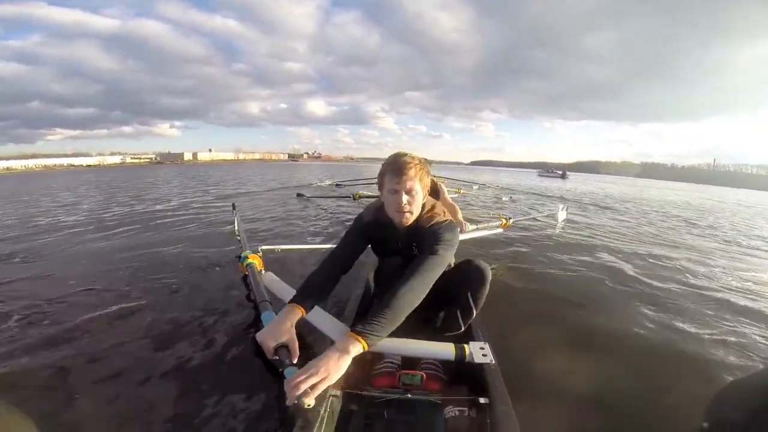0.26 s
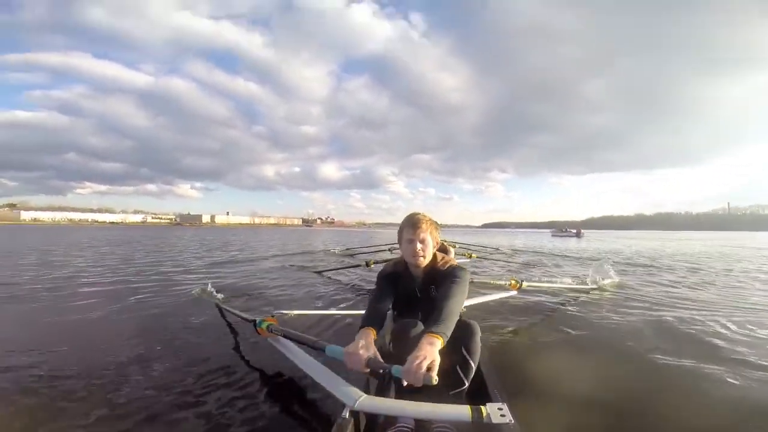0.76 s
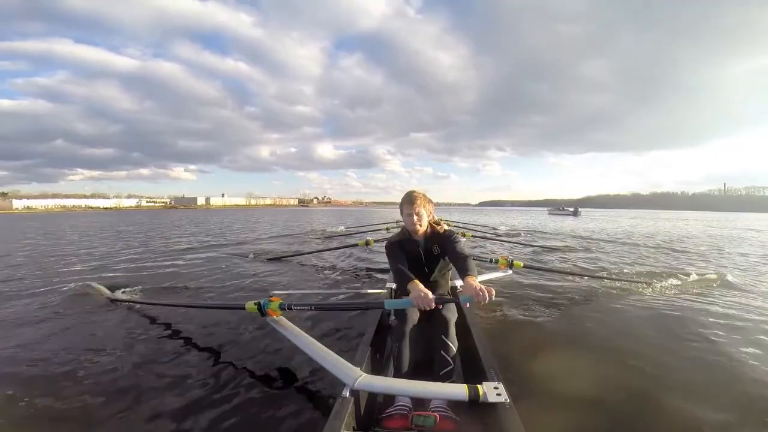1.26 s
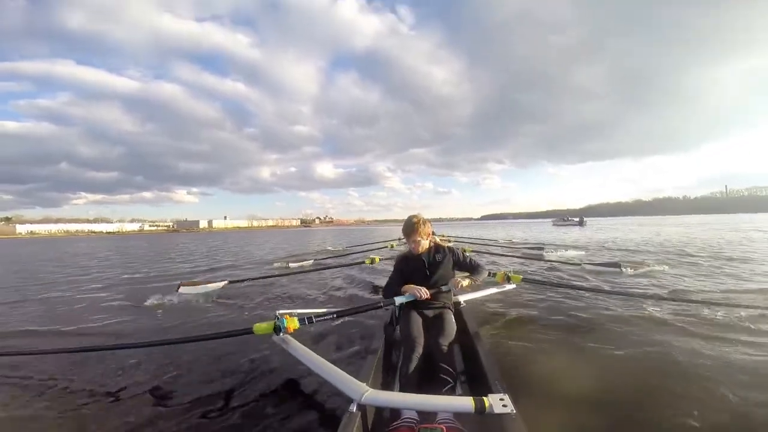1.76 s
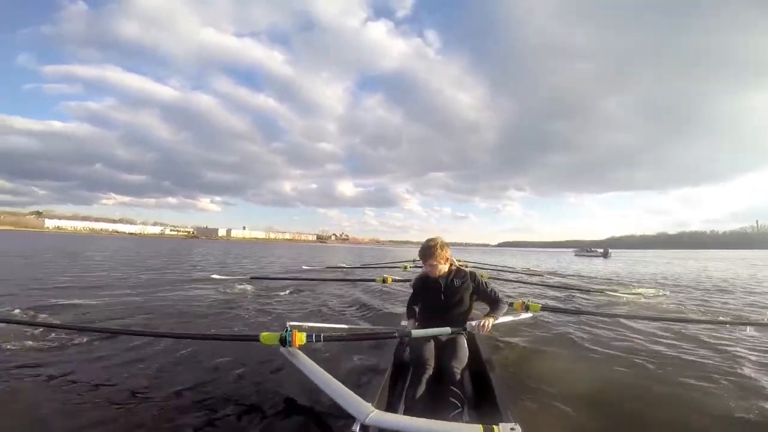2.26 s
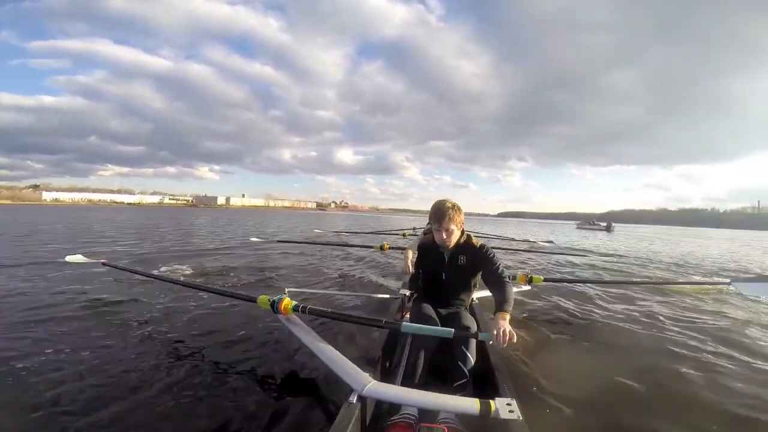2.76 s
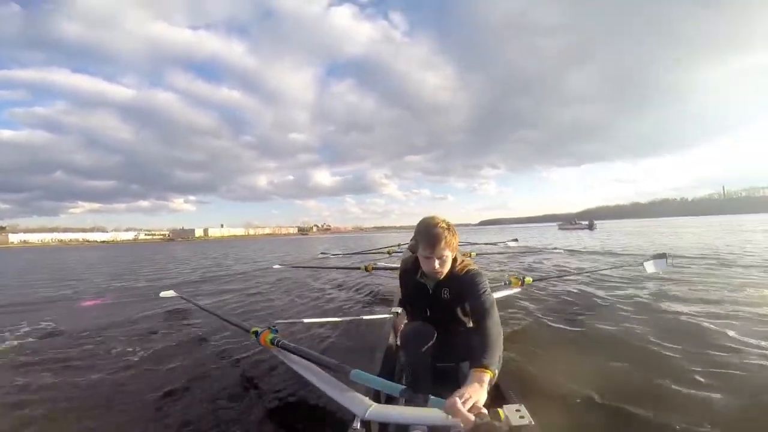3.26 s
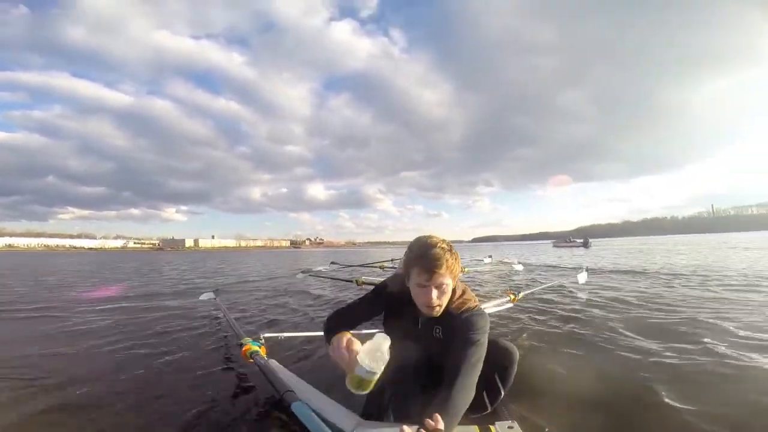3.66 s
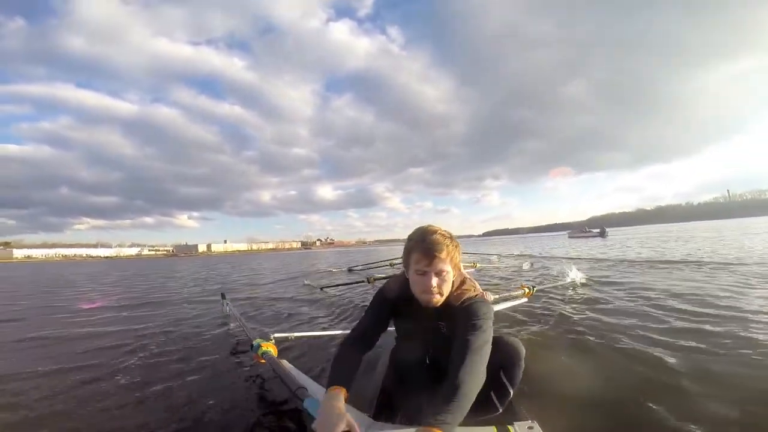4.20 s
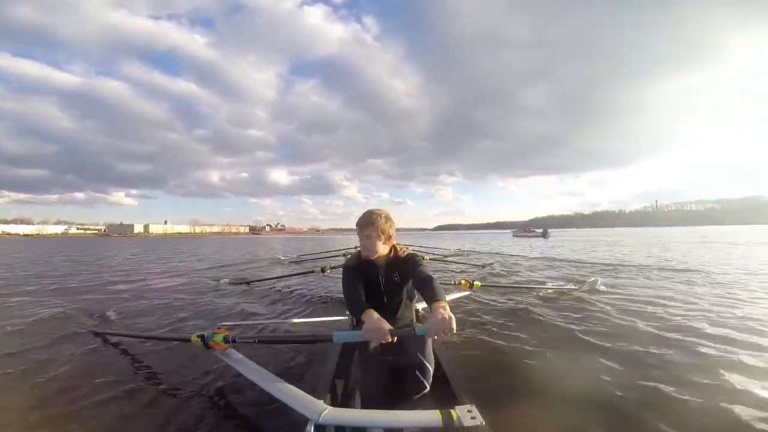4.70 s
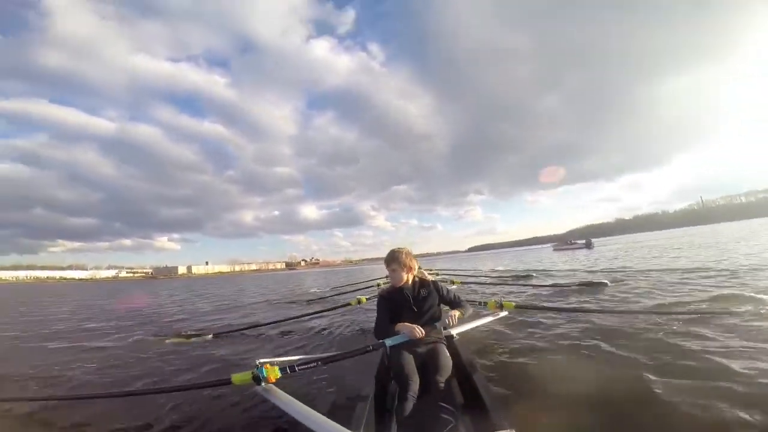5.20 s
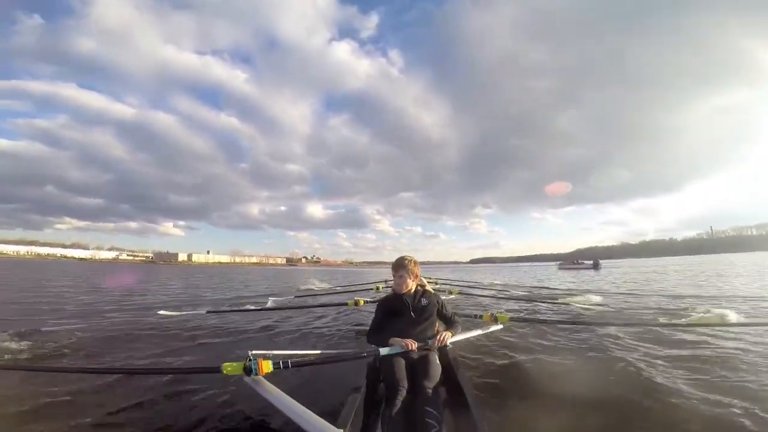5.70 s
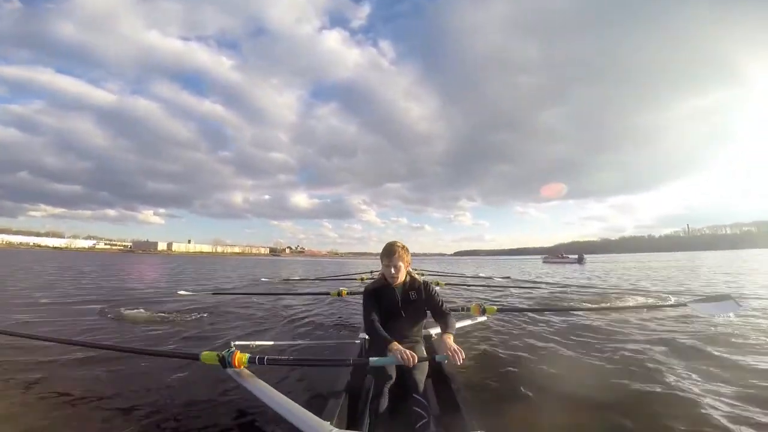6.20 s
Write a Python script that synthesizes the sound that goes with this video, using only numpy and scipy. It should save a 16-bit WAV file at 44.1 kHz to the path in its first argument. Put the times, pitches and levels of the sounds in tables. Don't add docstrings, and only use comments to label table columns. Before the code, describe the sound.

A camera in a sealed plastic housing rides a rowing shell on open water, so everything is close, boxy and muffled. From 0 to 0.7 seconds fingers scrape, squeak and tap the case, its walls bulging and popping with low pressure bumps; the scrape near 0.42 is sharpest. Very hard low blows hit at 0.98 and around 1.15, among more rubbing, with smaller thuds and a sharp tug from 1.48 to 1.55. Handling then ends. Water rumbles and gurgles while wet spray rustles on the case; small clicks fall near 1.8-2.1, and soft hull thumps at 1.97, 2.33-2.63. After 2.7 it is much quieter: light oarlock knocks at 3.46, clusters around 3.9 and 4.4, tiny plops, a dull thump at 5.2, more clicks and a plop at 5.45. Faint hiss, thin high whine and barely audible chirps about every 1.1 seconds persist to 6.4.

```python
import sys
import numpy as np
from scipy import signal
from scipy.fft import rfft, irfft, next_fast_len
from scipy.io import wavfile
from scipy.ndimage import map_coordinates

SR = 44100
rng = np.random.default_rng(int(sys.argv[2]) if len(sys.argv) > 2 else 0)


def waveform_to_disk(signal):
    frames = np.transpose(np.atleast_2d(signal))
    scaled = np.clip(frames, -1, 1) * 32767
    samples = np.round(scaled).astype(np.int16)
    wavfile.write(sys.argv[1], SR, samples)


def volts_from_decibels(level):
    exponent = np.asarray(level, float) / 20
    return 10 ** exponent


N = 284445

# (centre [Hz], width [Hz], level [dB])
LOW_BODY_MODES = [(1248, 470, -8), (1549, 252, 1.5), (1812, 293, -1)]
HIGH_BODY_MODES = [(2008, 120, 1.5), (2170, 134, -0.5), (2340, 130, 2), (2700, 192, 2.5), (2920, 256, 2.5),
                   (3277, 450, -7), (3560, 210, -6.5)]
EDGE_MODES = [(3745, 1650, -1), (4420, 1380, 6.5)]
RIM_MODES = [(5607, 440, -2.5), (6010, 280, 1), (6300, 470, -9)]
AIR_MODES = [(6970, 1300, 1), (9130, 820, 2), (9430, 490, 7.5), (12400, 4700, -16)]
DRY_SKIN_MODES = [(8850, 800, 2.5), (10400, 1500, -4.5), (12800, 3000, -7)]
DULL_MODES = [(289.5, 147, 1), (600, 570, -1.4), (922, 630, -1.2)]
KNOCK_MODES = [(1630, 670, -6.5), (2275, 775, -1.5), (2720, 750, -3)]
CLINK_MODES = [(4300, 1300, -3.5), (5590, 880, -2), (6300, 660, -4.5)]
PIN_MODES = [(4220, 900, -1.5), (6170, 490, -10)]
# (centre [Hz], width [Hz], level [dB])
WET_HIGH_MODES = [(2140, 390, 0.5), (2500, 300, 2.5), (2873, 330, -2)]
DRAINED_LOW_MODES = [(1070, 200, -3.5), (1650, 310, 10.5)]
DRAINED_HIGH_MODES = [(2060, 620, -4.5), (2700, 660, -0.5), (3250, 1180, -11.5)]

# (start [s], length [s], level [dB], high over low body [dB], hardness [dB])
SCRAPES = [(0, 0.023, -32.5, 6, -2), (0.018, 0.043, -34.5, 7, -6.5), (0.041, 0.079, -44.5, 2, -10.5),
           (0.114, 0.19, -52.5, 1, -8), (0.281, 0.16, -52.5, 2, -9.5), (0.4122, 0.011, -22.5, 10.5, -11),
           (0.421, 0.037, -27, 7.5, -16), (0.454, .062, -48, -2, -14), (0.513, 0.45, -45.5, -2.5, -11),
           (0.653, 0.038, -31, 2, -3), (0.684, 0.035, -35.5, -8, -4), (0.723, 0.049, -54, -3, -9),
           (0.816, 0.19, -43.5, -2.5, -14), (0.99, 0.39, -48.5, 2, -12.5), (1.291, 0.11, -44, 1.5, -11.5),
           (1.143, 0.057, -36.5, -1.5, -9), (1.179, 0.12, -40.5, 4.5, -10), (1.32, 0.22, -43.5, 0, -16.5)]
# (peak [s], length [s], level [dB], high over low body [dB], hardness [dB])
SWELLS = [(0.4307, 0.047, -21.5, 8, -2.5), (0.1654, 0.035, -44, -4, -11),
          (0.473, 0.041, -34.5, -2.5, -14.5), (0.52, 0.043, -38.5, -5.5, -16.5),
          (0.72, 0.1, -33, 3.5, -12.5), (.768, 0.039, -42, -1, -8), (.815, 0.086, -38, 0, -6),
          (1.123, 0.11, -42, -1.5, -7.5), (1.5, 0.094, -43, -25, -28), (1.449, 0.16, -38, 4, -11),
          (1.3, 0.052, -34.5, -4, -13), (.672, 0.044, -33, 1, 1.5), (0.8, 0.033, -45, -4, 1),
          (1.459, .022, -33, -3, -21), (1.16, .03, -36, 1, -22), (1.03, .05, -60, 5, -8)]
# (time [s], level [dB], length [s])
GLIDES = [
    (.02, -62, .06),
    (.8, -65, .09),
    (.9, -74, .08),
    (1.06, -68, 0.12),
    (1.15, -60, 0.065),
    (1.23, -70, 0.11),
    (1.32, -71, .05),
    (1.45, -67, 0.063),
]
# (time [s], strength [dB], wetness, favours low body [dB])
WASH = [(1.5, -52, 6), (1.75, -52, 8.5), (1.96, -53, 3), (2.41, -60, 4), (2.92, -65.5, -4), (3.24, -67, -1),
        (4.15, -65.5, -6), (4.31, -61, -9), (4.58, -62.5, -4.5), (5.07, -64.5, -3.5), (5.14, -57.5, -2),
        (5.31, -61, -2), (5.65, -57, -10.5), (5.97, -61.5, 0), (6.45, -67.5, -4)]
# (time [s], peak [dB], length [s])
SQUEEZES = [(0.051, -14, 0.037), (.059, -15, 0.017), (.121, -11.5, 0.02), (0.197, -9.5, 0.025),
            (0.269, -8, 0.051), (.343, -12.5, 0.047), (.424, -13, .016), (.4365, -9.5, .03),
            (0.531, -25, 0.016), (0.667, -14.5, 0.014), (0.678, -14.5, 0.017)]
# (time [s], peak [dB], rise [s], fall [s])
POPS = [(-.012, -12.5, 0.012, 0.084), (.012, -7.5, 0.0024, 0.0045), (.076, -9, 0.0018, 0.0099),
        (.135, -6.5, 0.001, 0.002), (0.151, -7.5, 0.0011, 0.0033), (.155, -8, 0.0014, 0.0089),
        (.281, -13, .002, 0.016), (0.4029, -9.5, 0.00036, 0.0032), (0.532, -8.5, 0.0023, .004),
        (0.55, -10, 0.0018, 0.0051), (0.564, -18.5, .002, 0.0057), (.575, -15, 0.0018, 0.0063),
        (.654, -12.5, .001, .006), (1.477, -17, 0.00086, 0.0016), (1.508, -12.5, 0.0013, 0.0026)]
# (time [s], peak [dB], dull part [dB], bright part [dB], t60 [s])
TAPS = [(0.1338, -29.5, 6, -22, 0.015), (.156, -25, -13, -24, 0.013), (0.1996, -28, 4.5, -25, 0.027),
        (0.229, -29.5, -4, -21, 0.024), (0.2669, -26.5, -19, -20, 0.015), (0.283, -24, -28, -17, 0.056),
        (0.3197, -47, 12.5, -11.5, .02), (0.343, -24, -21, -29, 0.018), (0.4018, -12.5, -24, -42, 0.02),
        (0.077, -29.5, -0.5, -23, 0.013), (0.4645, -29, 4.5, -43.5, 0.029), (0.492, -18, -14, -29, 0.029),
        (0.518, -28.5, -8, -34, 0.065), (0.608, -17, -17, -17, 0.019), (0.6577, -13.5, -8.5, -25, 0.014),
        (0.7837, -24, -6.5, -20, 0.033), (1.138, -2, -20.5, -30, 0.018), (1.553, -26.5, -3.5, -42, 0.048)]
# (time [s], peak [dB], dull part [dB], bright part [dB], air part [dB])
CLICKS = [(0.9805, -15.5, -36, -23.5, -19), (1.6485, -43.5, 8, -28, -32), (1.779, -30, -4, -20, -35),
          (1.858, -39, -25, -6, -36), (1.926, -29.5, -6, -16, -30), (1.9553, -29, 0, -18, -42),
          (2.086, -38.5, -0.5, -5.5, -27), (2.4949, -25.5, -3, -33, -36), (2.8153, -40, -7.5, -7, -23),
          (3.289, -38, -20, -14, -24), (3.876, -41, -2, -8, -10), (3.904, -43, -13, -5, -8),
          (3.919, -44, -20, -9, 2), (3.936, -43, 4, -4, -2), (4.1543, -36, -18, -27.5, -42),
          (4.2495, -30.5, -25, -9, -13), (4.254, -38, -17, -5, -14), (4.3014, -42.5, -6, -8, -23),
          (4.437, -45, -9, -7, -10), (4.4406, -37.5, -8, -6, -2), (5.4438, -37.5, -14, -4.5, -5),
          (5.448, -43, -6, -11, -14), (5.475, -43, -5, -1.5, 4), (5.4785, -47, -4, -4, -2)]
# (time [s], peak [dB], pitch [Hz], dull part [dB], bright part [dB])
KNOCKS = [(2.185, -40.5, 2120, -19, -25), (2.856, -43, 2200, 1, -4), (3.1343, -45.5, 2100, -4, 1.5),
          (3.4608, -32.5, 2220, -7.5, -3.5), (3.4685, -37.5, 2240, -4.5, -6), (3.474, -48, 2300, 3, -14),
          (3.8568, -47, 2640, -4, -5), (3.871, -49, 2650, -5, -1), (3.937, -40, 2500, -12, 0),
          (3.9395, -38, 2280, -17, -6), (3.9434, -44.5, 2620, -5, 2), (3.947, -45, 2500, -10, -6),
          (3.954, -42, 2400, -13, -14), (4.1473, -44.5, 2120, -14, 0), (4.23, -48, 2060, -25, -18),
          (4.3978, -51, 2570, -2, -2), (4.4042, -44.5, 2700, -5, 3), (4.411, -48.5, 2580, -8, -2),
          (5.1054, -38.5, 2700, -7, -7), (5.1806, -45.5, 1580, -9, -8), (5.2006, -44, 2240, -24, -13),
          (5.444, -43, 2560, -10, -6), (5.527, -43.5, 1630, -21, -12)]
# (pitch [Hz], level [dB])
KNOCK_PARTS = [(985, -6.5), (4470, -2.5), (6400, -9), (8200, -26)]
# (time [s], peak [dB], pitch [Hz])
PIPS = [(.4135, -20, 2500), (0.416, -30, 1270), (.4208, -21, 2500), (.428, -30, 1260), (.4258, -19.5, 6000),
        (.5645, -33, 2500), (.572, -36, 2380), (.6072, -29, 1960), (.6125, -26, 1800), (.6582, -15.5, 2010),
        (.681, -19, 1790), (.7832, -18, 2760), (1.429, -27, 1790), (1.5535, -20.5, 1710),
        (1.6457, -32, 1530), (1.6702, -34, 1670), (1.73, -36, 2350), (1.748, -31, 1800),
        (1.8687, -35, 1860), (1.8957, -38, 1770), (1.9255, -35.5, 4100), (1.9316, -27.5, 1890),
        (2.086, -46, 6300), (2.166, -50, 1910), (2.3052, -46, 1630), (3.0435, -60, 1710),
        (3.1234, -51, 4700), (3.51, -56, 5200), (4.0802, -49, 2680), (4.1874, -46.5, 4680),
        (4.192, -55, 4500), (5.517, -59, 4100), (5.5245, -49, 4300), (5.5435, -44.5, 4100),
        (5.5933, -47, 2130), (6.3625, -51, 2000)]
# (time [s], peak [dB], pitch [Hz], t60 [s], rise [s])
BLOWS = [
    (0.2, -16.5, 145, 0.017, 0.0011),
    (0.231, -16.5, 80, 0.04, 0.0025),
    (.594, -29, 110, .04, .002),
    (.9815, -4, 80.4, 0.042, 0.00062),
    (1.012, -24, 80, 0.055, 0.0035),
    (1.1655, -3, 87, 0.028, 0.004),
    (1.479, -22, 105, 0.015, 0.00096),
    (1.484, -25, 70, 0.032, 0.0011),
    (1.527, -24, 50, 0.046, 0.00072),
    (1.796, -23, 69, 0.039, 0.0016),
]
# (time [s], peak [dB], pitch [Hz], t60 [s], rise [s])
TUGS = [
    (1.5527, -20.5, 71, 0.089, 0.00039),
]
# (time [s], peak [dB], pitch [Hz], rise [s])
THUMPS = [(1.683, -29, 195, 0.0033), (1.966, -19, 114, 0.0032), (2.329, -18, 103.6, 0.016),
          (2.354, -19.5, 115, 0.015), (2.496, -19.5, 100, 0.0029), (2.57, -23, 85, 0.006),
          (2.633, -18.5, 131, 0.018), (2.842, -36.5, 59.7, 0.0011), (3.015, -33, 41.6, 0.0044),
          (4.104, -34.5, 110, 0.0067), (4.793, -29, 130, 0.014), (5.123, -35, 100, 0.0027),
          (5.176, -31.5, 112, .0065), (5.207, -19, 123, 0.023), (5.679, -32.5, 172, 0.012)]
# (time [s], peak [dB], pitch [Hz])
PLOPS = [
    (3.95, -45.5, 466),
    (3.99, -48.5, 600),
    (4.29, -49.5, 340),
    (4.44, -49, 580),
    (5.112, -51, 713),
    (5.445, -40.5, 458),
]
# (time [s], strength [dB])
HULL = [(0, -31.5), (.21, -39.5), (.6, -33.5), (.8, -37), (1.26, -41), (1.62, -34), (1.75, -36.5),
        (2.1, -38), (2.53, -45), (3.09, -51.5), (3.45, -47.5), (4.6, -50), (5.19, -45.5), (5.57, -46.5),
        (5.82, -51), (6.45, -50.5)]
# (time [s], level [dB], length [s])
SLOSHES = [(.09, -66, 0.027), (.55, -52, 0.15), (.74, -50.5, 0.28), (1.1, -52, 0.12), (1.46, -49, .1),
           (1.94, -51, 0.064), (2.06, -52, 0.085), (3.866, -56, 0.028), (3.945, -67, 0.03),
           (4.0, -67, 0.12), (4.44, -64, 0.057), (5.453, -58, .03), (5.6, -66, 0.5)]
# (time [s], level [dB], length [s])
LURCHES = [(.8, -39, .1), (1.02, -33.5, 0.1), (1.17, -22.5, 0.097), (1.53, -27, 0.19), (2.03, -33.5, 0.12),
           (2.36, -31.5, 0.11), (2.52, -29.5, 0.086), (2.84, -37.5, 0.11), (3.02, -44, 0.21),
           (3.45, -57, 0.24), (3.89, -50, 0.048), (4.06, -46, 0.27), (4.55, -47, 0.063), (5.25, -49, 0.45),
           (5.72, -47, 0.18), (5.91, -46, 0.047), (6.37, -42, 0.071)]
# (frequency [Hz], density [dB per Hz])
HEAVE_SPECTRUM = [(4, -36), (10, -14.5), (18, -2), (42, -6.5), (62, -9), (120, -120)]
RUMBLE_SPECTRUM = [(24, -3.5), (40, 2.5), (81, -4), (128, -3.5), (216, -12.5), (330, -24), (430, -39),
                   (730, -120)]
GURGLE_SPECTRUM = [(150, -41.5), (250, -2), (426, -3.5), (475, -5), (657, -6.5), (1400, -12.5), (1820, -28),
                   (3080, -120)]
HISS_SPECTRUM = [(1760, -44), (3000, -1), (5280, -2.5), (5800, -7), (6820, -6.5), (10800, -12),
                 (14900, -18), (15400, -49)]
# (multiple of the base [1], level [dB])
WHINE = [(2, -73), (3, -88), (4, -81), (5, -89)]
# (time [s], level [dB])
BLINKS = [
    (1.58, -77),
    (2.685, -72),
    (3.825, -74),
    (4.915, -71),
    (6.01, -76),
]


def unit(x):
    return x / np.sqrt(np.mean(x ** 2) + 1e-20)


def curves(rows):
    time_s, *columns = np.transpose(rows)
    return [np.interp(np.arange(N) / SR, time_s, column) for column in columns]


def wobble(rate_hz):
    steps = np.arange(0, N + 16, 16)
    knots = rng.standard_normal(int(N * rate_hz / SR) + 4)
    coarse = map_coordinates(knots, [steps * rate_hz / SR])
    return np.interp(np.arange(N), steps, coarse)


def bumps(rows):
    t = np.arange(N) / SR
    gain = np.zeros(N)
    for at_s, db, span_s in rows:
        fade = np.minimum(4 * (t - at_s) ** 2 / span_s ** 2, 10)
        gain += volts_from_decibels(db - 15 * fade)
    return gain


def filtered(x, response):
    m = next_fast_len(N + SR // 2)
    return irfft(rfft(x, m) * response(np.fft.rfftfreq(m, 1 / SR)), m)[:N]


def coloured(spectrum):
    point_hz, point_db = np.transpose(spectrum)

    def response(hz):
        return volts_from_decibels(np.interp(np.log(hz + 1), np.log(point_hz + 1), point_db))

    return unit(filtered(rng.standard_normal(N), response))


def ringing(x, modes, order=2):
    def response(hz):
        total = 0
        for k, (centre_hz, width_hz, db) in enumerate(modes):
            damping = 1j * hz * width_hz
            total = total + (-1) ** k * volts_from_decibels(db / order) * damping / (centre_hz ** 2 - hz ** 2 + damping)
        return total ** order

    return filtered(x, response)


def add_at(out, at_s, sound):
    start = round(at_s * SR)
    out[..., start:start + sound.shape[-1]] += sound


def rubbing():
    t = np.arange(N) / SR
    touching = t < WASH[0][0]
    wet = t < 2.6
    gains = np.sqrt(strokes() + (~touching * spray()) ** 2)
    low_gain, high_gain, edge_gain, rim_gain, air_gain = gains
    grain_sizes = volts_from_decibels(.4 * wobble(30) + .9 * wobble(90) + 2.2 * wobble(600))

    def part(modes):
        grains = grain_sizes * rng.standard_normal(N)
        return unit(ringing(grains, modes)) * volts_from_decibels(.8 * wobble(35))

    low = np.where(wet, part(LOW_BODY_MODES), part(DRAINED_LOW_MODES))
    high = np.select([touching, wet], [part(HIGH_BODY_MODES), part(WET_HIGH_MODES)], part(DRAINED_HIGH_MODES))
    body = low * low_gain + high * high_gain
    shell = part(EDGE_MODES) * edge_gain + part(RIM_MODES) * rim_gain
    air = part(AIR_MODES) * air_gain + part(DRY_SKIN_MODES) * bumps(GLIDES)
    return body + shell + air


def strokes():
    power = np.zeros((5, N))
    # (start s, length s, fade s, sag to the ends dB, place of most pressure -1..1, level, tilt, hardness dB)
    rows = [(at_s, span_s, .002, 7, -0.36, *rest) for at_s, span_s, *rest in SCRAPES]
    rows += [(peak_s - span_s / 2, span_s, .3 * span_s, 18, 0, *rest) for peak_s, span_s, *rest in SWELLS]
    for at_s, span_s, fade_s, sag_db, peak, db, tilt_db, hard_db in rows:
        u = np.linspace(-1, 1, round(span_s * SR))
        eased_db = sag_db * (u - peak) ** 2
        bite_db = hard_db - 0.39 * eased_db
        low_db = 0 * u - tilt_db / 2
        high_db = 0 * u + tilt_db / 2
        edge_db = -2 + 0.82 * bite_db
        air_db = -10 + 1.31 * bite_db
        shares = volts_from_decibels([low_db, high_db, edge_db, bite_db, air_db])
        fade = np.clip((1 - np.abs(u)) * span_s / (2 * fade_s), 0, 1)
        start = max(round(at_s * SR), 0)
        power[:, start:start + len(u)] += (shares * volts_from_decibels(db - eased_db) * fade) ** 2
    return power


def spray():
    spray_db, wet_db = curves(WASH)
    over_db = spray_db - spray_db.mean()
    edge_db = -67.5 + 0.74 * over_db
    rim_db = -72 + 0.44 * over_db
    air_db = -95 + .4 * over_db
    return volts_from_decibels([spray_db + wet_db, spray_db, edge_db, rim_db, air_db])


def squeezes():
    vent_hz, wall_hz = 6.2, 2500
    t = np.arange(SR * 2) / SR
    pressure = np.zeros(len(t))
    for at_s, db, span_s in SQUEEZES:
        pressure -= volts_from_decibels(db + 4) * np.exp(-8 * ((t - at_s) / span_s) ** 2)
    for at_s, db, rise_s, fall_s in POPS:
        since_s = np.maximum(t - at_s, 0)
        pressure += volts_from_decibels(db + 4.5) * (1 - np.exp(-since_s / rise_s)) ** 2 * np.exp(-since_s / fall_s)

    def response(hz):
        vent = 1j * hz / (vent_hz + 1j * hz)
        return vent / (1 + 1j * hz / wall_hz) ** 2

    return filtered(pressure, response)


def ticks():
    t = np.arange(SR // 8) / SR
    drive = np.zeros((4, N + SR))
    rows = [(at_s, db, dull, bright, bright - 24, t60_s) for at_s, db, dull, bright, t60_s in TAPS]
    rows += [(*row, 0.02) for row in CLICKS]
    for at_s, db, dull_db, bright_db, air_db, t60_s in rows:
        crackle = rng.standard_normal((4, len(t))) + 6 * (t == 0)
        decay = volts_from_decibels(db - 60 * t / max(t60_s, .003))
        shares = volts_from_decibels([[dull_db + 17], [9], [bright_db + 12], [air_db - 5.5]])
        add_at(drive, at_s, decay * crackle * shares)
    groups = (DULL_MODES, KNOCK_MODES, CLINK_MODES, AIR_MODES)
    return sum(ringing(d[:N], modes) for d, modes in zip(drive, groups))


def knocks():
    t = np.arange(SR // 5) / SR
    out, drive = np.zeros(N + SR), np.zeros((2, N + SR))
    for at_s, db, hz, dull_db, bright_db in KNOCKS:
        decay = volts_from_decibels(db - 3.5 - 60 * t / 0.063)
        rattle = decay * rng.standard_normal((3, len(t)))
        ring = burst(hz, t)
        for share_db, (part_hz, part_db) in zip([dull_db] + 3 * [bright_db], KNOCK_PARTS):
            ring = ring + volts_from_decibels(share_db + part_db) * burst(part_hz, t)
        b, a = signal.iirpeak(hz, hz / 600, SR)
        tail = signal.lfilter(b, a, signal.lfilter(b, a, rattle[0]))
        add_at(out, at_s, volts_from_decibels(db) * ring + volts_from_decibels(9.5) * tail)
        add_at(drive, at_s, rattle[1:] * volts_from_decibels([[dull_db + 17], [bright_db + 6]]))
    for at_s, db, hz in PIPS:
        add_at(out, at_s, volts_from_decibels(db) * burst(hz, t))
    return out[:N] + ringing(drive[0, :N], DULL_MODES[1:]) + ringing(drive[1, :N], PIN_MODES)


def burst(hz, t):
    contact_s = 0.00079
    u = t / contact_s
    return u * np.exp(1 - u) * np.sin(2 * np.pi * (hz * t + rng.uniform()))


def thuds():
    t = np.arange(SR // 2) / SR
    out = np.zeros(N + SR)
    rows = [(-1, *row) for row in BLOWS]
    rows += [(-1, at_s, db, hz, 0.088, rise_s) for at_s, db, hz, rise_s in THUMPS]
    rows += [(-1, *row, 0.073, 0.0051) for row in PLOPS]
    rows += [(1, *row) for row in TUGS]
    for way, at_s, db, hz, t60_s, rise_s in rows:
        rise_s = max(rise_s, .0003)
        sag = 0.95 * np.exp(-rise_s / 0.0025)
        turns = hz * (t + sag * 0.0054 * (1 - np.exp(-t / 0.0037)))
        swing = way * np.sin(2 * np.pi * turns) * (1 - np.exp(-t / rise_s))
        add_at(out, at_s, volts_from_decibels(db + 6.5 - 60 * t / max(t60_s, .02)) * swing)
    return out[:N]


def water():
    rumble_db, = curves(HULL)
    gurgle_db = -59.5 + 0.61 * (rumble_db + 47)
    slaps = wobble(18)
    heave = (volts_from_decibels(-52.5) + bumps(LURCHES)) * coloured(HEAVE_SPECTRUM)
    rumble = unit(volts_from_decibels(1.8 * slaps + 2 * wobble(30)) * coloured(RUMBLE_SPECTRUM))
    gurgle = unit(volts_from_decibels(1.1 * slaps + 1.6 * wobble(50)) * coloured(GURGLE_SPECTRUM))
    return heave + volts_from_decibels(rumble_db) * rumble + (volts_from_decibels(gurgle_db) + bumps(SLOSHES)) * gurgle


def electronics():
    out = volts_from_decibels(-70) * coloured(HISS_SPECTRUM)
    whine_hz = 2933 + 6.5 * wobble(300)
    phase = 2 * np.pi * np.cumsum(whine_hz) / SR
    for multiple, db in WHINE:
        out += volts_from_decibels(db + 0.5 + 1.2 * wobble(60)) * np.sin(multiple * phase)
    t = np.arange(round(.055 * SR)) / SR
    turns = 10300 * t + 250 * .02 * np.exp(-t / 0.022)
    chirp = np.sin(2 * np.pi * turns) * signal.windows.tukey(len(t), .2)
    for at_s, db in BLINKS:
        add_at(out, at_s, volts_from_decibels(db + 2.8 * wobble(150)[:len(t)]) * chirp)
    return out


def scene():
    handling = rubbing() + squeezes() + ticks()
    boat = knocks() + thuds() + water()
    return (handling + boat + electronics())[None]


def top_cut(x):
    return signal.sosfilt(signal.butter(12, 15130, fs=SR, output="sos"), x)


def record(dry):
    mix = dry / (1 + np.abs(dry / 2.1) ** 8) ** (1 / 8)
    return top_cut(mix)


dry = scene()
out = record(dry)
waveform_to_disk(out)
```